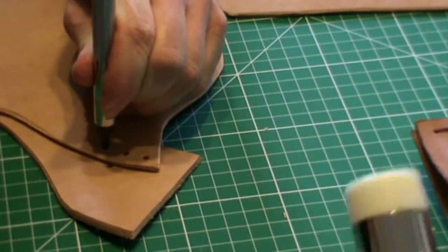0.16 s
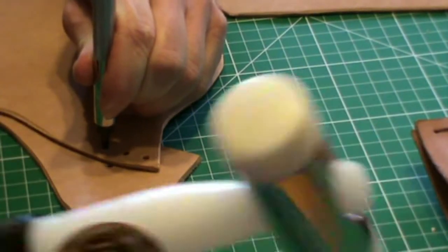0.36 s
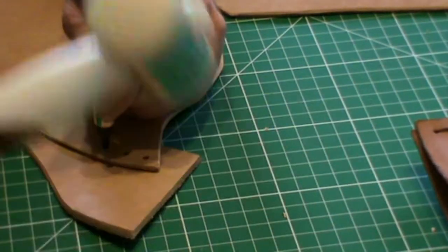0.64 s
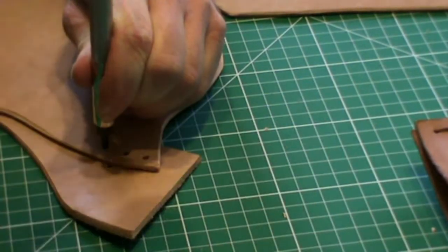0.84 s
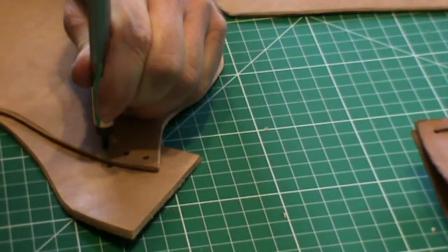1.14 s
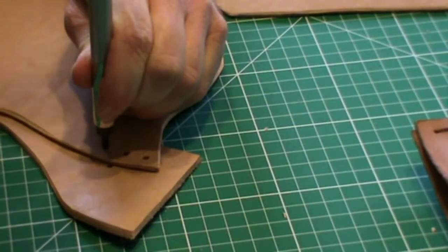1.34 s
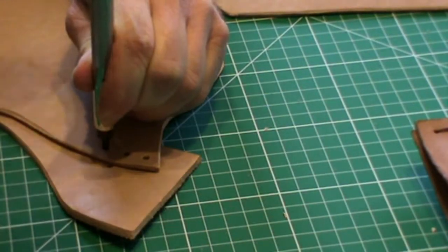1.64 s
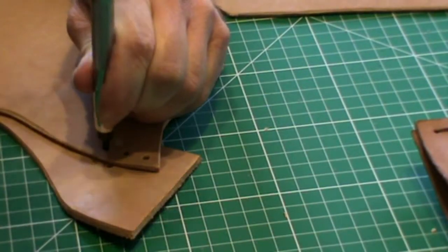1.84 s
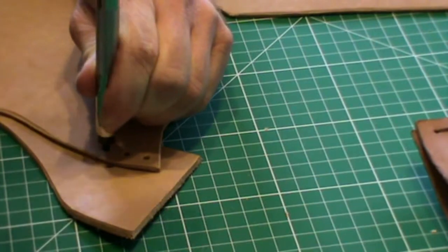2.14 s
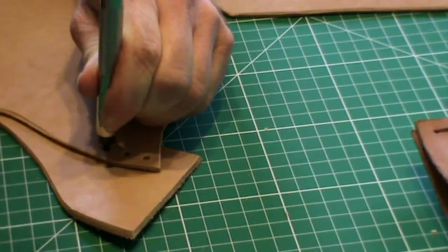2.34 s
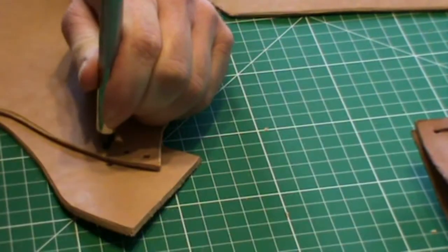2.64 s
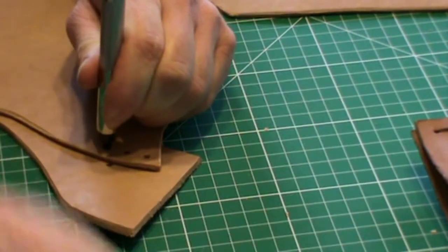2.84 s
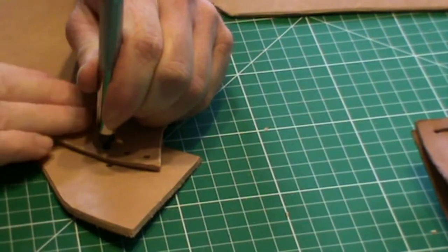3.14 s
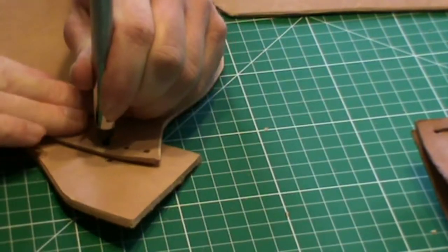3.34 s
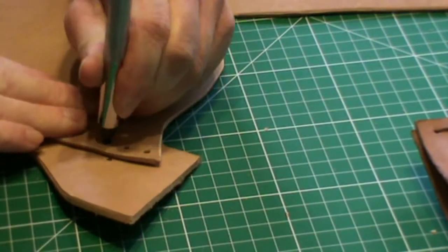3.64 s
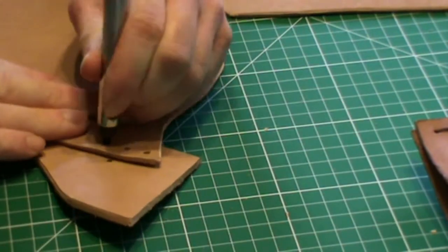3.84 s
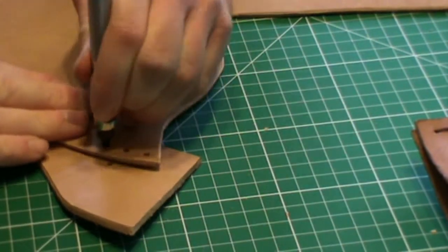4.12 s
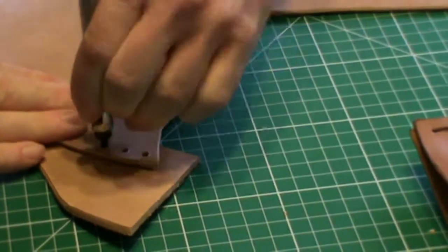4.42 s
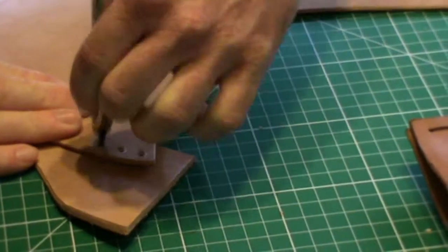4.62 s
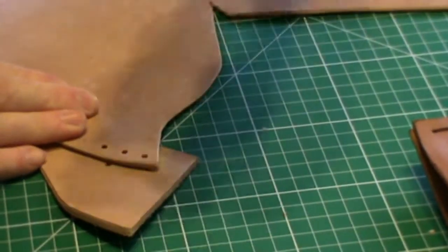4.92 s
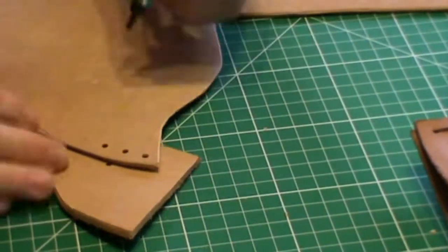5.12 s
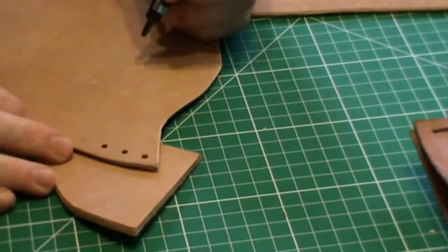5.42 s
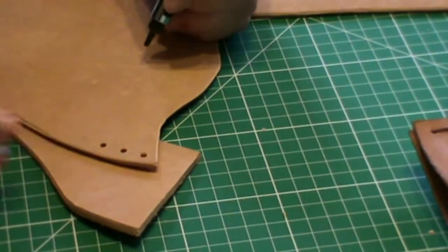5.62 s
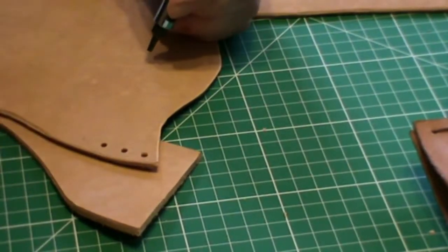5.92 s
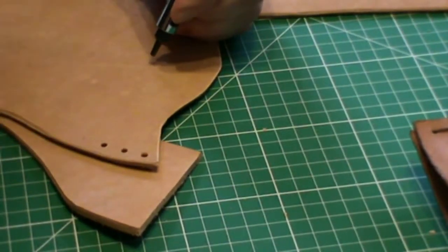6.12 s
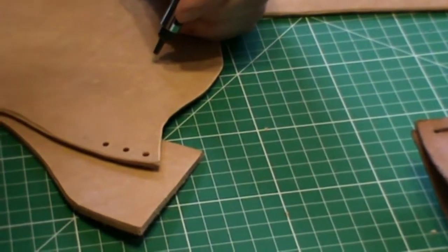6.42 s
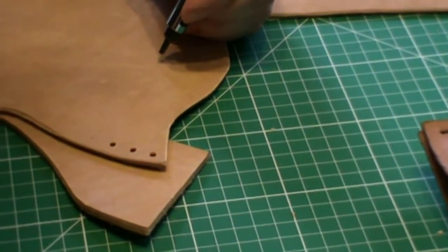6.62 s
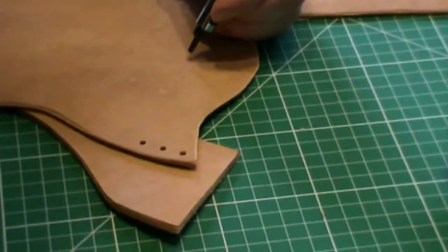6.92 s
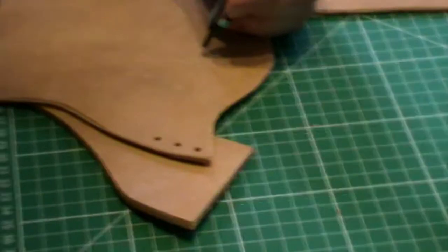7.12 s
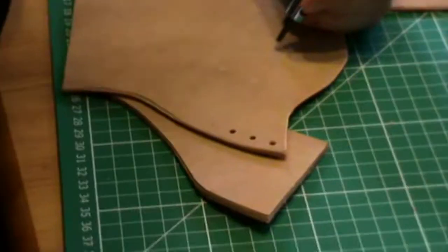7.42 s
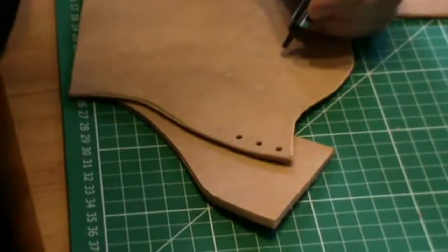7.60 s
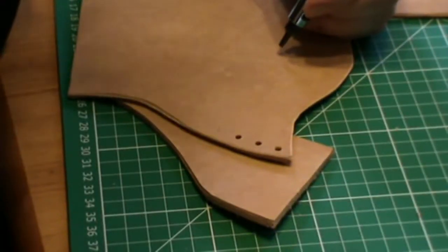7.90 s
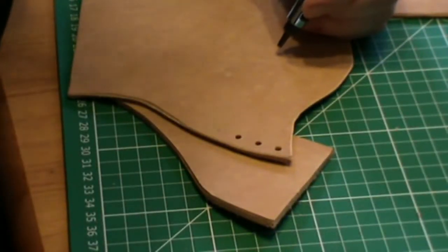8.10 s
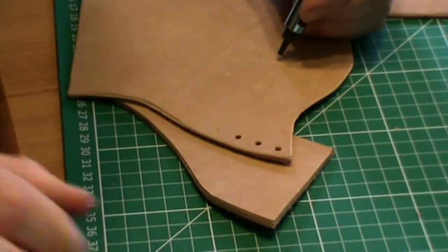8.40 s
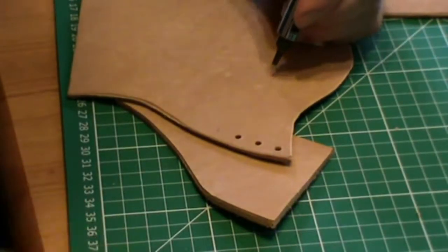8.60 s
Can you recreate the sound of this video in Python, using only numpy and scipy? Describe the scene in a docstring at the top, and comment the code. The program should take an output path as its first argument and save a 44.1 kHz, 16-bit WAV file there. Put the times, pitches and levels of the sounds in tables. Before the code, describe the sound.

Faint room air and electrical hum run throughout, heard close up in a slightly echoing workshop. After a soft knock at the start, a mallet taps a steel hole punch at 1 second. Loud blows follow at 1.4, 1.7 and 2 seconds, with a quick double at 2.7, each cracking on the steel and booming through the bench. From 4.1 to 4.6 seconds the punch twists out of the leather in rapid, dry, squeaky snaps that weaken, with soft finger rubbing. Light knocks, a tiny squeak and brief slides follow until 5.5 seconds. A metal tool clinks and bounces at 6.1. From 6.6 to 7.5 seconds a camera mount sticks and slips in rattling thumps, with small plastic clicks and a short squeak near 7.1. Faint rubbing continues, a very faint low tone passes around 8.2, and a light double knock comes at 8.6.

```python
"""A workbench in a live room, close to a camera: a mallet drives a hole punch through leather.
Each blow cracks on the steel, booms through the bench and pushes the camera's limiter down. Fingers
slide over the leather and the punch twists out in sharp slips. Hands and tools knock and squeak, a
metal tool clinks, and the camera mount sticks and slips in a judder as it is turned.
Room air and a faint mains hum lie underneath; a low tone comes and goes near the end."""
import sys
import numpy as np
from scipy import signal
from scipy.fft import rfft, irfft
from scipy.io import wavfile
from scipy.ndimage import uniform_filter1d, minimum_filter1d

SR = 44100
rng = np.random.default_rng(int(sys.argv[2]) if len(sys.argv) > 2 else 0)


def int16_out(signal):
    """Quantize to a 16-bit WAV file."""
    q = np.round(np.clip(np.atleast_2d(signal).T, -1, 1) * 32767)
    wavfile.write(sys.argv[1], SR, q.astype(np.int16))


N = 385864
T = np.arange(SR) / SR  # time axis of a one-shot [s]
HZ = np.fft.rfftfreq(4096, 1 / SR)  # frequency axis of every EQ curve

# reverb decay of the room: (frequency [Hz], t60 [s])
ROOM_DECAY = [(60, 0.59), (130, 0.54), (260, 0.56), (700, 0.46), (1800, 0.51), (4800, 0.52), (9000, 0.44),
              (15000, 0.27)]
# stereo image of the reverb and of the room air: (frequency [Hz], left-right correlation [-1..1])
ROOM_IMAGE = [(60, 1), (130, 0.93), (290, 0.87), (640, 0.42), (1400, 0.2), (3100, 0.43), (7000, 0.32),
              (15000, 1)]
AIR_IMAGE = [(25, .6), (60, 0.87), (130, 0.99), (290, 0.74), (640, 0.48), (1410, -0.035), (3100, -0.061),
             (6820, 0.28), (15000, 1)]
# colour of the room air and hiss: (frequency [Hz], gain [dB])
AIR_EQ = [(25, -10), (70, -14.5), (150, -5), (250, -11), (400, -7.5), (600, -8), (950, -5.5), (1400, -11),
          (2150, -9), (3000, -15.5), (5500, -19.5), (9000, -23.5), (16000, -26.5)]
# partials of the mains hum: (frequency [Hz], level [dB])
HUM_PARTIALS = [(150, -80), (200, -69), (249.5, -66.5), (299.5, -69), (349.5, -68), (399, -69.5),
                (449, -72.5), (499, -68.5), (549, -65), (599, -67), (5190, -81.5)]

# hands and tools knock on the bench: (time [s], level [dB], steel crack [dB], hollow ring [Hz])
KNOCK_CUES = [(.087, -20, -47, 340), (.100, -20, -49, 335), (4.647, -8.5, -18, 370),
              (5.0195, -28, -7.5, 345), (5.125, -25, -19, 340), (8.617, -14.5, -13.5, 406),
              (8.632, -7, -47, 406)]
# mallet blows: (time [s], level [dB], contact cut-off [Hz], bass [dB], punch resonance [Hz],
# its boost [dB], steel crack [dB], onset tick [dB])
BLOW_CUES = [(1.0168, 4, 840, 12.5, 1720, 4.5, -34.5, -31), (1.4124, 32.5, 1940, 7, 2890, 9, -19.5, -34.5),
             (1.7454, 36, 1690, 6, 3460, 16, -23, -40), (2.0296, 37, 1690, 4.5, 3330, 12.5, -20, -33.5),
             (2.6944, 30.5, 920, -10.5, 656, 1, -38, -33.5),
             (2.7689, 36, 1186, -5.5, 2820, 13.5, -34.5, -48)]
# colour of a soft knock, the bench under a blow and the steel's crack: (frequency [Hz], gain [dB])
KNOCK_EQ = [(40, -44), (110, -3), (170, -4), (250, -5), (370, 0), (550, -1.5), (900, -8), (1300, -11.5),
            (2200, -28.5), (5000, -65), (16000, -58)]
BENCH_EQ = [(30, -27), (65, -23), (105, -8.5), (170, -2), (250, -3.5), (400, 0.5), (800, 0), (1150, -1.5),
            (1600, 3), (2400, 1.5), (16000, 11.5)]
CRACK_EQ = [(100, -13), (2000, 7), (4500, -1), (5800, -4.5), (7000, -4.5), (8700, -5), (10700, -6.5),
            (13000, -17), (16000, -49)]
# resonances of the bench top and of the steel punch: (frequency [Hz], width [Hz], boost [dB])
BENCH_PEAKS = [(405, 35, 2.5), (512, 25, 5), (537, 27, -1.5), (642, 68, 7.5), (700, 14, 3), (814, 78, 7),
               (897, 30, 6), (966, 35, 7.5), (990, 25, 1.5), (1056, 33, 9), (1290, 37, 8), (1498, 49, 2.5),
               (1655, 96, 5), (2600, 230, -8)]
STEEL_PEAKS = [(1470, 160, 3), (1780, 110, 2), (4080, 120, 4.5), (4620, 200, 5), (5350, 150, 2.5),
               (6550, 200, 4), (7250, 150, 0), (8800, 300, -3), (10500, 200, 3.5), (11300, 150, 6),
               (12040, 400, -3)]
# low modes of the bench: (frequency [Hz], level [dB], t60 [s])
BENCH_MODES = [(108.2, -52, 0.46), (153, -55, .66), (163.8, -62, 0.7), (199.2, -51.5, 0.58),
               (296.4, -53.5, 0.52), (333, -57.5, 0.44), (405, -62.5, 0.67), (504.5, -66.5, 0.62),
               (635, -61.5, 0.53)]
# placement of the bench's boom: (frequency [Hz], left minus right [dB])
BENCH_PAN = [(60, 1), (110, 1.5), (200, -1.0), (380, -1), (700, 1), (1290, -4), (2380, -2.5), (4400, -2),
             (8120, 0.5), (15000, -2)]

# fingers slide over the leather: (start [s], length [s], level [dB])
SLIDE_CUES = [(4.12, 0.49, -52.5), (4.99, 0.026, -53), (5.11, 0.076, -56), (5.38, .04, -58.5),
              (5.53, 0.031, -54)]
# the punch twists out in slips that weaken as it comes free: (time [s], level [dB])
SLIP_CUES = [(4.177, 1.5), (4.2299, 0.5), (4.2653, 1.5), (4.2868, 2), (4.3015, 1), (4.316, -6), (4.3296, 0),
             (4.3443, -2.5), (4.4133, -0.5), (4.4322, -5.5), (4.4487, -4.5), (4.4901, -5.5), (4.5222, -4),
             (4.5392, -8), (4.5518, -8.5), (4.570, -10), (4.5875, -9), (4.6095, -9)]
# colour of rubbed leather and of a slip: (frequency [Hz], gain [dB])
LEATHER_EQ = [(60, -3), (400, -3), (1000, 0.5), (1650, -0.5), (3000, -7.5), (6000, -10.5), (11000, -12),
              (16000, -22)]
SLIP_EQ = [(100, -18), (600, -7), (1100, -4.5), (1550, -10.5), (2400, -6), (3500, -4), (4700, -6),
           (6000, -4.5), (8000, 0.5), (9500, -3.5), (12000, 0), (14500, -7), (16500, -28)]
# resonances of a slip: (frequency [Hz], width [Hz], boost [dB])
SLIP_PEAKS = [(1483, 244, 14.5), (1780, 110, 12), (4660, 320, 11), (7740, 120, -6), (9750, 220, -2)]
# placement of a slip: (frequency [Hz], left minus right [dB])
SLIP_PAN = [(400, -.5), (900, -4), (4400, -2), (8100, 1), (15000, 2)]

# things squeak as they are handled: (time [s], level [dB], pitch [Hz], attack [s])
SQUEAK_CUES = [(5.02, -17, 1780, 0.0081), (7.111, -18, 1950, 0.0045), (7.12, 0.5, 1843, 0.0032)]
# a metal tool touches down and bounces: (time [s], level [dB])
CLINK_CUES = [(6.137, 9), (6.170, 2)]
# the camera mount sticks and slips: (time [s], level [dB])
JUDDER_CUES = [(6.573, -14), (6.653, -11), (6.672, -12), (6.719, -14), (6.781, -3), (6.792, -3),
               (6.818, -7.5), (7.056, -5.5), (7.123, 5.5), (7.197, 5.5), (7.216, 6), (7.28, 2.5),
               (7.312, 4), (7.41, 4.5), (7.484, -14.5), (7.767, -17)]
# the camera clicks as it is gripped: (time [s], level [dB])
CLICK_CUES = [(6.755, -19), (6.836, -13.5)]
# pushes that turn the mount: (start [s], length [s], level [dB])
TURN_CUES = [(6.76, 0.075, -43.5), (7.17, 0.16, -29.5), (7.42, 0.05, -40.5), (7.65, 0.86, -57.5)]
# colour of the metal tool, the camera on its mount and a plastic click: (frequency [Hz], gain [dB])
TOOL_EQ = [(50, -11), (190, -5.5), (400, 0), (800, -0.5), (1050, -2.5), (1300, 0.5), (1800, 1), (3000, 3.5),
           (4600, 7), (5400, 4), (8000, 4.5), (11000, -7), (12200, -1), (15500, -26)]
MOUNT_EQ = [(25, -7), (60, 2.5), (100, 7), (140, 6.5), (200, 6.5), (400, -0.5), (850, 0.5), (1300, -3),
            (2050, -1), (2700, -5), (5000, -9.5), (7500, -7.5), (10000, -13), (16000, -28)]
CLICK_EQ = [(100, -25), (900, -11), (1700, 0), (4000, -3), (6500, -12), (16000, -35)]
# resonances of the tool and of the camera on its mount: (frequency [Hz], width [Hz], boost [dB])
TOOL_PEAKS = [(803, 54, 11), (1253, 100, 8.3), (2720, 50, 7.2), (3094, 130, 14), (4160, 70, 7),
              (4340, 120, 8), (4650, 120, 11.5), (4777, 99, 10.5), (5820, 73, 9), (7200, 170, 5.5),
              (10950, 450, -12), (11900, 200, 3)]
MOUNT_PEAKS = [(180, 38, 3), (253, 66, -6.5), (362, 70, 8), (580, 110, -3), (818, 135, 7), (1780, 250, 0.5),
               (2790, 70, 7), (6440, 240, 6), (7640, 120, 5), (9240, 180, 5.5)]

CREEP_S = 0.012  # the mount creeps for this long before it lets go


def amp(db):
    """Decibels to gain."""
    return 10 ** (np.asarray(db) / 20)


def curve(points, hz=HZ):
    """Joins breakpoints with straight lines over log frequency."""
    freqs, values = np.transpose(points)
    return np.interp(np.log(hz + 1), np.log(freqs + 1), values)


def bells(rows):
    """EQ curve in dB with one bell for each resonance."""
    return sum(db / (1 + (2 * (HZ - hz) / width) ** 2) for hz, width, db in rows)


def lowpass(hz, order):
    """Treble roll-off of a contact that lasts about 1 / hz."""
    return 1 / np.sqrt(1 + (HZ / hz) ** (2 * order))


def unit(x):
    """Normalises to a mean energy of 1 per channel."""
    return x / np.sqrt(np.mean(np.sum(x ** 2, -1)) + 1e-20)


def eq(x, gain):
    """Minimum-phase EQ of energy 1: the gain curve sets colour, not level."""
    log_gain = np.log(np.maximum(np.r_[gain, gain[-2:0:-1]] / gain.max(), 1e-5))
    response = np.exp(np.conj(signal.hilbert(log_gain)))
    taps = irfft(response[:len(HZ)])
    return signal.fftconvolve(x, unit(taps)[None], axes=1)


def pan(x, db):
    """Leans a sound left by db, or right if negative."""
    return x * amp(np.array([[db], [-db]]) / 2)


def pan_bands(x, placement):
    """Leans each band of a one-shot left or right."""
    side_db = curve(placement, np.fft.rfftfreq(2 * SR, 1 / SR))
    return irfft(rfft(x, 2 * SR) * amp(np.array([side_db, -side_db]) / 2))[:, :SR]


def noise(size, image=ROOM_IMAGE, db=lambda hz, t: 0):
    """Stereo noise with the given image, shaped by db(frequency, time); white by default."""
    white = rng.standard_normal((2, size))
    hz, t, (left, spare) = signal.stft(white, SR, nperseg=1024, noverlap=768)
    hz = hz[:, None]
    correlation = np.clip(curve(image, hz), -1, 1)
    right = correlation * left + np.sqrt(1 - correlation ** 2) * spare
    shaped = np.array([left, right]) * amp(db(hz, t))
    return signal.istft(shaped, nperseg=1024, noverlap=768)[1][:, :size]


def swells(cues, rise_s, fade_s):
    """Envelope that swells into each cue, holds and dies away exponentially."""
    t = np.arange(N) / SR
    envelope = np.zeros(N)
    for start, length, db in cues:
        before, after = np.maximum(start - t, 0), np.maximum(t - start - length, 0)
        envelope += amp(db) * np.exp(-before / rise_s - after / fade_s)
    return envelope


def add(mix, time, sound):
    """Drops a stereo sound into the mix at a time in seconds."""
    part = mix[:, round(time * SR):][:, :sound.shape[1]]
    part += sound[:, :part.shape[1]]


def room_tone():
    """The bed: room air, microphone hiss and a slightly wavering mains hum."""
    t = np.arange(N) / SR
    air = amp(-55) * np.sqrt(N) * unit(noise(N, AIR_IMAGE, lambda hz, t: curve(AIR_EQ, hz)))
    hum = 0
    for hz, db in HUM_PARTIALS:
        drift = rng.uniform(0, 2 * np.pi) + 0.0059 * np.cumsum(rng.standard_normal(N))
        hum += amp(db) * np.sqrt(2) * np.sin(2 * np.pi * hz * t + drift)
    return pan(air + hum, db=-1)


def rattle(t60):
    """Dense, short ringing of the struck thing itself."""
    return unit(noise(SR) * 1e-3 ** (T / t60))


def reverb(bloom_s):
    """The room blooms after the direct sound and dies band by band."""
    tail = noise(SR, db=lambda hz, t: -60 * t / curve(ROOM_DECAY, hz))
    return unit(tail * (1 - np.exp(-(T / bloom_s) ** 2)))


def bench_knock(db, crack_db, hollow_hz):
    """A hand or tool touches the bench: hollow wood with a bright tick on top."""
    wood = amp(curve(KNOCK_EQ) + bells(BENCH_PEAKS) + bells([(hollow_hz, 60, 8), (180, 40, 5)]))
    colour = np.hypot(wood, amp(curve(CRACK_EQ) + crack_db))
    ringing = amp(4) * rattle(t60=0.19) + amp(7) * reverb(bloom_s=0.0043)
    body = unit(eq(ringing, colour))[:, :SR]
    tick = eq(rattle(t60=0.011), amp(curve(CRACK_EQ) / 2))[:, :SR]
    return amp(db + 9.5) * pan(body + amp(crack_db + 6) * tick, db=-1.5)


def bench_ring():
    """The bench's low modes ring out; higher ones reach the two microphones further apart in phase."""
    ring = np.zeros((2, SR))
    for hz, db, t60 in BENCH_MODES:
        spread = min(hz / 1000, np.pi / 4) * np.array([[1], [-1]])
        phase = rng.uniform(0, 2 * np.pi) + rng.choice([-1, 1]) * spread
        ring += amp(db - 60 * T / t60) * np.sin(2 * np.pi * hz * T + phase)
    return ring


def mallet_blow(db, contact_hz, bass_db, punch_hz, punch_db, crack_db, onset_db):
    """A sharp onset tick gets through before the limiter clamps; the bench booms and fills the room."""
    bass_shelf = bass_db / (1 + (HZ / 260) ** 4)
    wood = amp(curve(BENCH_EQ) + bass_shelf + bells(BENCH_PEAKS) + bells([(punch_hz, 800, punch_db)]))
    steel = amp(curve(CRACK_EQ) + bells(STEEL_PEAKS) + crack_db)
    colour = np.hypot(wood * lowpass(contact_hz, order=4), steel)
    ringing = reverb(bloom_s=0.0013) + amp(-5.5) * rattle(t60=0.097) + bench_ring()
    attack = 1 - np.exp(-(T / 0.0018) ** 2)
    boom = pan_bands(eq(ringing * attack, colour), BENCH_PAN)
    onset_tick = eq(rattle(t60=0.004), amp(curve(CRACK_EQ) / 2))[:, :SR]
    # the hand damps the shank at once
    shank = eq(rattle(t60=0.014), steel * amp(bells([(4480, 1100, 17)])))[:, :SR]
    return amp(db) * (boom + amp(onset_db) * onset_tick + amp(crack_db - 10.5) * shank)


def finger_slides(grains_per_s=3000):
    """Fingers slide over the leather: a fine, uneven crackle."""
    grains = rng.standard_normal(N) * (rng.random(N) < grains_per_s / SR) * np.sqrt(SR / grains_per_s)
    grains *= swells(SLIDE_CUES, rise_s=0.049, fade_s=0.048)
    impulse_in_room = (T == 0) + amp(-1.5) * reverb(bloom_s=0.004)
    grain_sound = unit(eq(impulse_in_room, amp(curve(LEATHER_EQ))))
    return signal.fftconvolve(grains[None], grain_sound, axes=1)[:, :N]


def punch_slip(db):
    """Leather lets go of the steel with a dry snap, straight into the microphones."""
    tilt_db_per_octave = -0.3 + 0.15 * db  # weaker slips are duller
    octaves = np.log2(np.maximum(HZ, 1000) / 6000)
    colour = amp(curve(SLIP_EQ) + bells(SLIP_PEAKS) + tilt_db_per_octave * octaves)
    centre = amp(-5) * (T == 0) + amp(-4) * unit(rattle(t60=0.0038).mean(0))
    snap = centre + amp(-3.5) * rattle(t60=0.013)
    bass_cut = amp(-8 / (1 + (HZ / 2500) ** 2))
    direct = unit(eq(snap, colour * bass_cut))
    tail = eq(reverb(bloom_s=0.0027), colour * lowpass(12700, order=2))
    return amp(db - 0.4) * pan_bands(direct + amp(-3.5) * tail, SLIP_PAN)


def handling_squeak(db, hz, attack_s):
    """A short rubbed note that swells and dies, its pitch unsteady."""
    phase = 2 * np.pi * hz * T + 0.23 * np.cumsum(rng.standard_normal(SR))
    note = unit(T / attack_s * np.exp(-T / attack_s) * np.sin(phase))
    tail = unit(signal.fftconvolve(note[None], reverb(bloom_s=0.0067), axes=1)[:, :SR])
    return amp(db) * (note + amp(-5) * tail)


def tool_clink(db):
    """A hard contact sets the metal tool ringing, and the room carries the ring on."""
    ringing = amp(2) * rattle(t60=0.039) + amp(-5) * rattle(t60=0.2) + amp(2) * reverb(bloom_s=0.0075)
    return amp(db) * pan(eq(ringing, amp(curve(TOOL_EQ) + bells(TOOL_PEAKS))), db=-0.3)


def mount_colour(cutoff_hz):
    """Gain curve of the camera body resonating on its mount, with the top rolled off."""
    return amp(curve(MOUNT_EQ) + bells(MOUNT_PEAKS)) * lowpass(cutoff_hz, order=1)


def mount_creep(db):
    """Soft, dull friction that swells just before the mount lets go."""
    friction = unit(noise(SR) * T / CREEP_S * np.exp(-T / CREEP_S))
    return amp(db - 7.5) * eq(friction, mount_colour(cutoff_hz=1500))


def mount_judder(db):
    """One slip of the mount thumps and rattles the camera body."""
    colour = mount_colour(cutoff_hz=4800 * 2 ** (db / 4))  # harder slips open up an octave per 4 dB
    attack = 1 - np.exp(-T / 0.00093)
    ringing = amp(-4) * rattle(t60=0.027) * attack + amp(-1) * rattle(t60=0.12)
    body = unit(eq(ringing, colour))
    bass_cut = amp(-6 / (1 + (HZ / 700) ** 2))  # bass reaches the microphones mainly through the body
    tail = eq(reverb(bloom_s=0.007), colour * bass_cut)
    return amp(db) * pan(body + amp(-5.5) * tail, db=-1.4)


def grip_click(db):
    """A light, dead click of plastic as the camera is gripped."""
    return amp(db) * eq(rattle(t60=0.014) + amp(-10) * reverb(bloom_s=0.004), amp(curve(CLICK_EQ)))


def mount_rub():
    """Fine, grainy friction of the turning mount between its slips."""
    grain = uniform_filter1d(rng.standard_normal(N), size=200)
    friction = noise(N) * amp(3 * grain / grain.std())
    rub = eq(friction, mount_colour(cutoff_hz=2100))[:, :N]
    return np.sqrt(N) * unit(rub) * swells(TURN_CUES, rise_s=0.047, fade_s=0.021)


def low_tone(start_s, length_s, db, hz):
    """A faint low tone comes and goes, a little unsteady."""
    phase = 2 * np.pi * hz * np.arange(N) / SR + 0.0204 * np.cumsum(rng.standard_normal(N))
    return np.sqrt(2) * np.sin(phase) * swells([(start_s, length_s, db)], rise_s=0.01, fade_s=0.02)


def scene():
    """Lays the one-shots over the bed and the friction layers."""
    mix = room_tone() + mount_rub() + finger_slides()
    mix += low_tone(start_s=8.125, length_s=0.24, db=-58, hz=243.4)
    tracks = ((BLOW_CUES, mallet_blow), (SLIP_CUES, punch_slip), (KNOCK_CUES, bench_knock),
              (CLINK_CUES, tool_clink), (JUDDER_CUES, mount_judder), (CLICK_CUES, grip_click),
              (SQUEAK_CUES, handling_squeak))
    for cues, source in tracks:
        for time, *settings in cues:
            add(mix, time, source(*settings))
    for time, db in JUDDER_CUES:
        add(mix, time - CREEP_S, mount_creep(db))
    return mix


def release(over_db, db_per_s):
    """Follows rises at once and falls back at a steady rate."""
    fall = np.arange(N) * db_per_s / SR
    return np.maximum.accumulate(over_db + fall) - fall


def record(dry, threshold_db=-11, detector_s=0.002, top_hz=16300):
    """A fast limiter flattens the blows and a slow gain control lingers; then hard clip and high cut."""
    pole = np.exp(-1 / (detector_s * SR))
    power = signal.lfilter([1 - pole], [1, -pole], (dry ** 2).mean(0))
    over_db = np.maximum(10 * np.log10(power + 1e-12) - threshold_db, 0)
    over_db = uniform_filter1d(-minimum_filter1d(-over_db, size=41), size=41)  # 1 ms look-ahead
    duck_db = 0.8 * release(over_db, db_per_s=209) + 0.13 * release(over_db, db_per_s=2.5)
    limited = np.clip(dry * amp(-duck_db), -1, 1)
    high_cut = signal.firwin(255, top_hz, window=("kaiser", 9), fs=SR)
    return signal.oaconvolve(limited, high_cut[None], "same")


dry = scene()
out = record(dry)
int16_out(out)
```